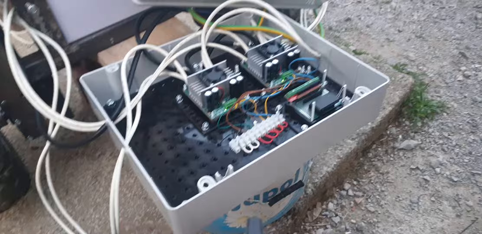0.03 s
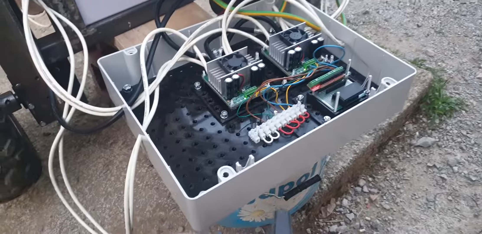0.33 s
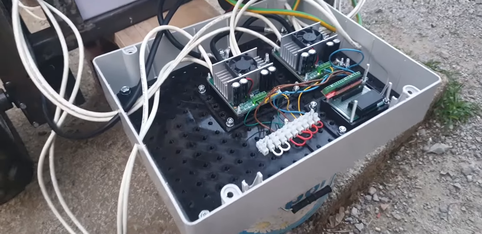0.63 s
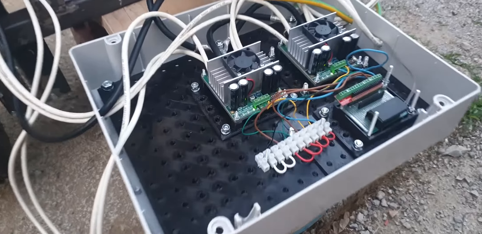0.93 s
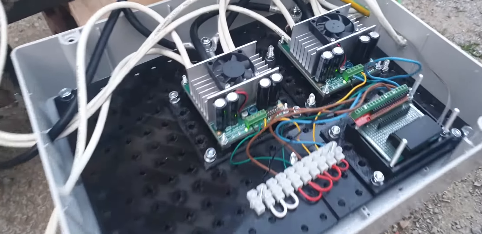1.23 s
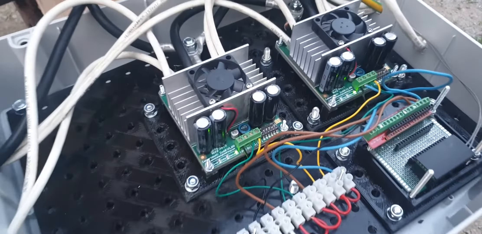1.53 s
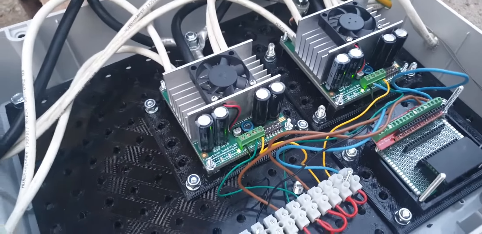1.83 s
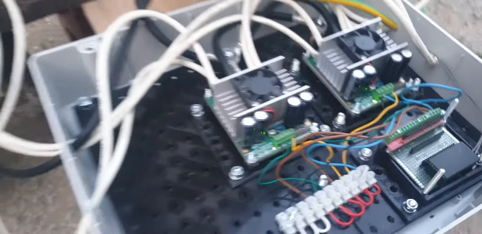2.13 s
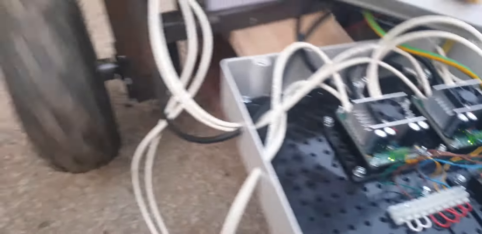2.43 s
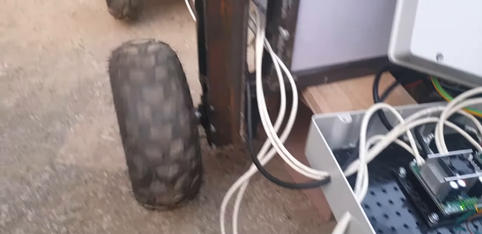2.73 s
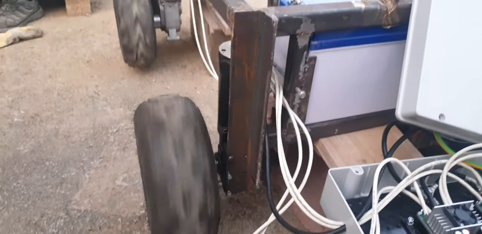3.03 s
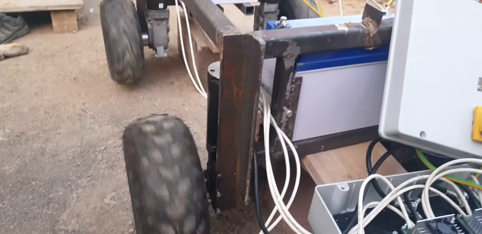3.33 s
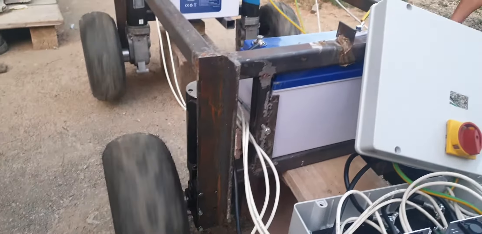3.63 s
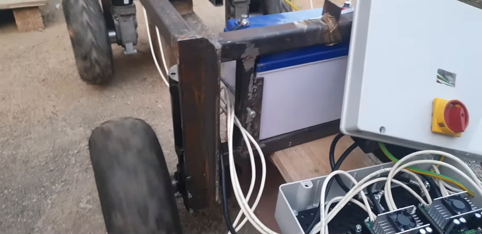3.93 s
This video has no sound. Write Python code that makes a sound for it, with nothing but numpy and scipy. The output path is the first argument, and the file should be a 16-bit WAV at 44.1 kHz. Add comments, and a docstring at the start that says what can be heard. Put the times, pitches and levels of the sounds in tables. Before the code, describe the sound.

Geared motors of an electric wheelchair growl, hum and hiss in short spurts, close to a hand-held microphone that is bumped twice. The spurts grow louder and whine, with knocks on the steel frame and tyres scrubbing gritty concrete.

```python
"""A home-built electric wheelchair drives in short spurts over gritty concrete, close to a hand-held phone.
First small cooling fans whirr. Near 0.4 s the geared motors start to growl, hum and hiss, and loose gears
knock the steel frame. Just after 1 s a hand bumps the phone twice. From about 2 s the spurts grow louder
and the gears whine. In the last 1.5 s the growl fades, the knobbly tyres scrub hardest, grit snaps under
them, and slipping rubber and gears squeak."""
import sys
import numpy as np
from scipy import signal
from scipy.fft import rfft, irfft
from scipy.io import wavfile
from scipy.ndimage import uniform_filter1d

SR = 44100
rng = np.random.default_rng(int(sys.argv[2]) if len(sys.argv) > 2 else 0)


def store_wav(level_fs):
    """Save 16-bit WAV to argv[1]."""
    pcm = np.round(np.clip(np.atleast_2d(level_fs), -1, 1) * 32767)
    wavfile.write(sys.argv[1], SR, pcm.T.astype(np.int16))


N = 176400
TIME = np.arange(N) / SR
TOP_HZ = 16000  # the highest pitch the phone keeps


def undb(db):
    """Turn decibels into a number to multiply by."""
    return 10 ** (np.asarray(db) / 20)


def unit(x):
    """Scale a signal to an average strength (rms) of 1."""
    return x / np.sqrt(np.mean(x ** 2))


def curve(table, column):
    """Join a table's points in time with straight lines."""
    rows = np.array(table)
    return np.interp(TIME, rows[:, 0], rows[:, column])


def response(points, size):
    """Turn (f/Hz, level/dB) points into a gain for every frequency."""
    hz, db = np.array(points).T
    bins_hz = np.maximum(np.fft.rfftfreq(size, 1 / SR), 1)
    return undb(np.interp(np.log(bins_hz), np.log(hz), db))


def colour(x, points):
    """Give a sound the tone colour in a table, at strength 1."""
    size = 4096
    cepstrum = irfft(np.log(response(points, size)))
    cepstrum[1:size // 2] *= 2  # folded so that the filter rings after a click, never before
    cepstrum[size // 2 + 1:] = 0
    ring = irfft(np.exp(rfft(cepstrum)))
    return unit(signal.fftconvolve(x, ring)[:len(x)])


def band(x, hz, octaves):
    """Keep only the pitches around hz, with a peak of 1."""
    edges = np.minimum(hz * 2 ** (octaves * np.array([-.5, .5])), TOP_HZ)
    y = signal.sosfilt(signal.butter(2, edges, "band", fs=SR, output="sos"), x)
    return y / np.abs(y).max()


def wander(per_s):
    """A smooth random drift, about 1 in size."""
    hold = int(SR / per_s)
    steps = np.repeat(rng.standard_normal(N // hold + 1), hold)
    return unit(uniform_filter1d(uniform_filter1d(steps, hold), hold)[:N])


def uneven(spread_db):
    """A random size for every sample."""
    return undb(spread_db * np.clip(rng.standard_normal(N), -2, 2))


def clicks(per_s, spread_db):
    """Tiny hits at random times, some bigger than others."""
    return uneven(spread_db) * (rng.random(N) < per_s / SR) * rng.choice([-1, 1], N)


def add(out, x, start_s):
    """Mix a sound in at a given time."""
    i = int(start_s * SR)
    out[..., i:i + x.shape[-1]] += x[..., :N - i]


def pan(db):
    """Left and right gains; below 0 dB the right is louder."""
    return undb(np.array([[db], [-db]]) / 2) / np.sqrt((undb(db) + undb(-db)) / 2)


def housing(x, amount=.5, decay_s=.009):
    """The motor cases and the frame add a short ring to a sound."""
    t = TIME[:SR // 15]
    tail = rng.standard_normal(len(t)) * np.exp(-t / decay_s)
    ring = signal.fftconvolve(x, tail / np.linalg.norm(tail))[:N]
    return (x + amount * ring) / np.hypot(1, amount)


# Tone colour of the fans: f/Hz, level/dB
FAN_COLOUR = [(25, -14), (115, 1), (200, -22), (15000, -43.5)]


def fans():
    """Cooling fans make a soft, low whirr that comes in at 0.1 s."""
    fade_in = undb(curve([(.085, -134), (.105, -73.5)], column=1))
    return fade_in * colour(rng.standard_normal(N), FAN_COLOUR)


# Bumps on the phone: t/s, level/dB, push time/s, boom against the push/dB
PHONE_BUMPS = [(1.0602, -27.5, 0.00045, -6), (1.2231, -23.5, 0.00065, -13.5)]


def phone_bumps(boom_hz=88.5, boom_s=.01):
    """A finger pushes the case near the right microphone; it springs back and booms."""
    out = np.zeros(N)
    for at, db, push_s, boom_db in PHONE_BUMPS:
        push = np.exp(-np.abs(TIME - at) / push_s)
        spring_back = .5 * np.exp(-((TIME - at - np.e * push_s) / (2 * push_s)) ** 2)
        after = np.maximum(TIME - at, 0)
        boom = undb(boom_db) * np.sin(2 * np.pi * boom_hz * after) * np.exp(-after / boom_s)
        out += undb(db) * (push - spring_back + boom)
    muffle = signal.butter(2, 2000, fs=SR, output="sos")
    return signal.sosfilt(muffle, out) * pan(-24)


# Grains breaking: t/s, level/dB, middle f/Hz, fade time/s
GRIT_SNAPS = [(.839, -37, 5500, .002), (2.541, -22, 5200, .012), (2.853, -28, 9000, .004),
              (2.953, -28, 6000, .006), (3.042, -21, 5500, .004), (3.224, -22, 3400, .004),
              (3.288, -24, 10000, .003), (3.415, -27, 6000, .009), (3.45, -25, 7200, .016),
              (3.929, -19, 5600, .005)]


def grit_snaps():
    """Single grains crack under the tyres, small ones higher; some crumble for a moment."""
    out, t = np.zeros((2, N)), TIME[:SR // 10]
    for at, db, hz, decay_s in GRIT_SNAPS:
        burst = rng.standard_normal((2, len(t))) * np.exp(-t / decay_s)
        add(out, undb(db) * pan(-3) * band(burst, hz, octaves=1.5), at)
    return out


# Squeaks and groans: t/s, length/s, level/dB, first f/Hz, last f/Hz
SLIP_SQUEAKS = [(.378, .028, -63, 820, 900), (2.68, .032, -36, 1390, 1440), (3.522, .062, -36, 950, 60)]


def squeaks():
    """Rubber and gears stick and slip, making short, shaky tones that slide in pitch."""
    out = np.zeros(N)
    for at, length_s, db, first_hz, last_hz in SLIP_SQUEAKS:
        progress = np.linspace(0, 1, int(length_s * SR))
        shake = 1 + .03 * wander(400)[:len(progress)]
        hz = (first_hz + (last_hz - first_hz) * progress) * shake
        swell = np.sqrt(np.abs(np.sin(np.pi * progress)))
        add(out, undb(db) * swell * np.sin(2 * np.pi * np.cumsum(hz) / SR), at)
    return out


# Notes the steel frame rings at: f/Hz, level/dB, time to fade by 60 dB/s
FRAME_NOTES = [(360, 1, .041), (639, -4, .05), (770, 0, .07), (1040, -8, .034), (1426, -7, .11),
               (1844, 5, .04)]
# Knocks on the frame: t/s, level/dB, f/Hz
FRAME_KNOCKS = [(.473, -51, 1570), (.579, -48.5, 580), (.669, -47, 570), (.756, -43.5, 500),
                (1.467, -33.5, 590), (1.532, -42, 470), (1.81, -37.5, 1470), (2.256, -38, 870),
                (2.67, -31, 610), (2.804, -26.5, 690), (3.043, -27.5, 686), (3.224, -33.5, 850),
                (3.293, -19.5, 760), (3.498, -25, 750), (3.682, -30, 726), (3.855, -33, 592)]


def frame_knocks(boost_db=4, ring_cycles=28, reach_octaves=.7):
    """Loose gears hit the frame; the struck part rings, and so do frame notes near its pitch."""
    out, t = np.zeros(N), TIME[:SR // 10]
    for at, db, knock_hz in FRAME_KNOCKS:
        ring = np.zeros(len(t))
        for hz, note_db, fade_s in FRAME_NOTES:
            nearness = np.exp(-(np.log2(hz / knock_hz) / reach_octaves) ** 2)
            sign = rng.choice([-1, 1])
            detuned_hz = hz * (1 + .013 * rng.standard_normal())
            ring += sign * nearness * undb(note_db - 60 * t / fade_s) * np.sin(2 * np.pi * detuned_hz * t)
        crack = band(rng.standard_normal(len(t)) * np.exp(-t / .004), knock_hz, octaves=1)
        part = np.sin(2 * np.pi * knock_hz * t) * undb(-60 * t * knock_hz / ring_cycles)
        knock = .7 * part + ring / np.abs(ring).max() + .6 * crack
        add(out, undb(db + boost_db) * knock / np.abs(knock).max(), at)
    return out


# Tone colour of tyres on grit: f/Hz, level/dB
TYRE_COLOUR = [(60, -28), (180, -5.5), (480, -16.5), (700, -6.5), (1250, -6), (1700, -1.5), (2250, -10.5),
               (3500, -17), (6400, -13.5), (7900, -24), (16000, -31)]
# Tyre scrubs: loudest t/s, level/dB, rise time/s
TYRE_SCRUBS = [(1.239, -53.5, .0043), (2.098, -40, 0.012), (2.565, -28, .017), (2.828, -33, 0.016),
               (3.089, -25, 0.026), (3.27, -28.5, 0.017), (3.737, -26.5, 0.022)]


def tyres(fall_s=.022):
    """The knobbly tyres scrub the concrete; each scrub is a swell of crunching grit."""
    swells = np.zeros(N)
    for at, db, rise_s in TYRE_SCRUBS:
        width_s = np.where(TIME < at, rise_s, fall_s)
        swells += undb(db) * np.exp(1 - np.hypot(1, 1.42 * (TIME - at) / width_s))
    flicker = undb(1.36 * wander(130))
    grit = housing(clicks(per_s=2400, spread_db=3.5))
    return swells * flicker * colour(grit, TYRE_COLOUR)


# Motor speed and gear whine: t/s, shaft turns per second/Hz, whine level/dB
SPEED_AND_WHINE = [(.37, 40, -115), (1.88, 86, -74), (1.92, 90, -50), (2.12, 96, -53), (2.23, 76, -78),
                   (2.42, 92, -55), (2.69, 86, -58), (2.735, 89, -39), (2.84, 94, -42), (2.93, 82, -68),
                   (3.17, 90, -44), (3.3, 96.5, -42), (3.55, 86, -64), (3.8, 90, -46), (3.92, 96, -42)]


def shaft_angle(wobble=.005):
    """How far the motor shaft has turned, in radians; its speed wobbles a little."""
    turns_per_s = curve(SPEED_AND_WHINE, column=1) * (1 + wobble * wander(30))
    return 2 * np.pi * np.cumsum(turns_per_s) / SR


def gear_whine(angle, teeth=11):
    """Gear teeth meet so fast that they sing, roughly, louder and softer as the load shifts."""
    roughness = .6 * (wander(170) + 1j * wander(170))  # shakes both loudness and timing
    tone = np.imag((1 + roughness) * np.exp(1j * teeth * angle))
    return undb(curve(SPEED_AND_WHINE, column=2)) * tone


def shaft_hum(angle, multiples=(1, 2, 6), levels_db=(-9, -10, -15)):
    """The spinning shaft hums in wavering tones at multiples of its turning rate."""
    return sum(undb(db + 3.55 * wander(10)) * np.sin(multiple * angle + .5 * wander(18))
               for multiple, db in zip(multiples, levels_db))


# Tone colour of the motor brushes: f/Hz, level/dB
BRUSH_COLOUR = [(900, 0.5), (2850, 0), (3600, -1.5), (5400, 2.5), (7000, -1), (7900, -11), (10800, -6.5),
                (16000, -18)]


def brush_hiss(angle, throb=.18):
    """The brushes (sliding contacts in the motor) hiss, swelling once a turn."""
    rubbing = rng.standard_normal(N) + .68 * unit(clicks(per_s=1500, spread_db=4.7))
    pulse = 1 + throb * np.sin(angle + wander(25.11))
    flicker = undb(1.5 + 1.62 * wander(45))
    return flicker * colour(housing(rubbing * pulse), BRUSH_COLOUR)


# Tone colours of the gears' rattle, growl and deep rumble: f/Hz, level/dB
RATTLE_COLOUR = [(100, -9), (190, 0), (470, -12), (620, 6.5), (760, 5), (900, -4), (1270, -7.5),
                 (1600, -3.5), (2400, -14), (9000, -42)]
GROWL_COLOUR = [(100, -12), (540, 10.5), (900, -21.5), (2000, -25)]
RUMBLE_COLOUR = [(22, -31), (40, 2.5), (170, 0.5), (270, -4), (1500, -41.5)]


def gear_rattle(clacks_per_s=38, growl_until_s=2.6):
    """Gear teeth chatter and clack over a rumble, growling lower while the chair gets going."""
    flicker = undb(.87 * wander(60))
    chatter = flicker * colour(housing(clicks(per_s=600, spread_db=3)), RATTLE_COLOUR)
    clack_count = np.cumsum(clacks_per_s * np.exp(.35 * wander(40))) / SR
    hits = np.diff(np.floor(clack_count), prepend=0) * uneven(3.2)  # one hit at each whole count
    clack = undb(-9) * colour(hits, RATTLE_COLOUR)
    early = 1 / (1 + np.exp((TIME - growl_until_s) / .19))  # slides from 1 down to 0
    grinding = unit(hits) + unit(clicks(per_s=500, spread_db=1.4))
    growl = undb(-7.5) * early * colour(grinding, GROWL_COLOUR)
    rumble = undb(-5.5) * colour(rng.standard_normal(N), RUMBLE_COLOUR)
    return (1 - .5 * early) * (chatter + clack) + growl + rumble


# How hard the motors work: t/s, rattle and hum level/dB, hiss level/dB
MOTOR_EFFORT = [(.36, -92, -104), (.39, -77.5, -74.5), (.6, -58, -70), (.88, -53.5, -62.5),
                (.98, -68.5, -75.5), (1.1, -66, -80.5), (1.13, -73, -61), (1.5, -44, -56), (1.79, -66, -77),
                (1.815, -51.5, -58.5), (1.92, -42.5, -48.5), (2.14, -40.5, -48), (2.205, -56, -61.5),
                (2.275, -57.5, -60), (2.315, -42, -48), (2.44, -43.5, -43.5), (2.56, -35.5, -42.5),
                (2.615, -41, -52.5), (2.65, -41.5, -52), (2.7, -38.5, -42), (2.84, -35, -41.5),
                (2.93, -50, -55), (2.97, -43.5, -42.5), (3.3, -39, -42.5), (3.6, -41.5, -46),
                (3.72, -45, -39), (3.82, -41, -46.5), (3.93, -34.5, -37.5), (4.0, -40.5, -47.5)]


def motors():
    """The geared motors run in spurts. Gives their tones, and two separate rows of their noise."""
    angle = shaft_angle()
    effort = undb(curve(MOTOR_EFFORT, column=1))
    hiss_gain = undb(curve(MOTOR_EFFORT, column=2))
    noise = np.array([effort * gear_rattle() + hiss_gain * brush_hiss(angle) for _ in range(2)])
    return effort * shaft_hum(angle) + gear_whine(angle), noise


# Sound bounced off the ground, against direct sound: f/Hz, level/dB (capped at 0 below)
GROUND_SCATTER = [(60, -10), (400, -10), (1200, -8.5), (5000, 8.5)]
# How much louder the left side is than the right: f/Hz, level/dB
LEFT_OVER_RIGHT = [(40, -4.5), (1200, 1.5), (5500, -4.5), (14000, 0)]


def microphones(direct, scattered, right_delay_s=.00016):
    """Sound reaches the left microphone first; what the ground scatters differs on each side."""
    size = N + SR // 2
    side = np.array([[1], [-1]])  # left, right
    share = np.minimum(response(GROUND_SCATTER, size), 1)
    both = (rfft(direct, size) + side * share * rfft(scattered, size)) / np.hypot(1, share)
    delay = np.exp(-2j * np.pi * np.fft.rfftfreq(size, 1 / SR) * np.array([[0], [right_delay_s]]))
    balance = response(LEFT_OVER_RIGHT, size) ** (side / 2)
    return irfft(both * delay * balance, size)[:, :N]


def scene():
    """The chair as it reaches the phone, plus snapping grit and the bumps of the hand."""
    motor_tones, motor_noise = motors()
    direct, scattered = (undb(2) * (fans() + tyres() + noise) for noise in motor_noise)
    direct += squeaks() + frame_knocks() + motor_tones
    return microphones(direct, scattered) + grit_snaps() + phone_bumps()


def record(dry):
    """The phone cuts the deepest rumble and the highest hiss."""
    low_cut = signal.butter(4, 32, "high", fs=SR, output="sos")
    high_cut = signal.ellip(10, .2, 70, TOP_HZ, fs=SR, output="sos")
    return signal.sosfilt(high_cut, signal.sosfilt(low_cut, dry))


dry = scene()
out = record(dry)
store_wav(out)
```